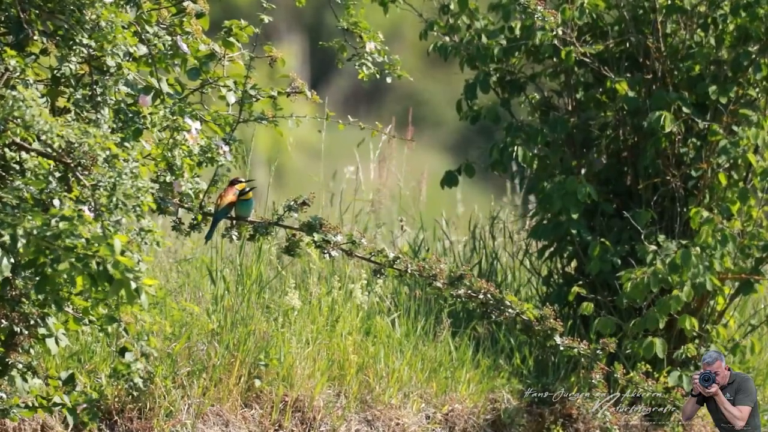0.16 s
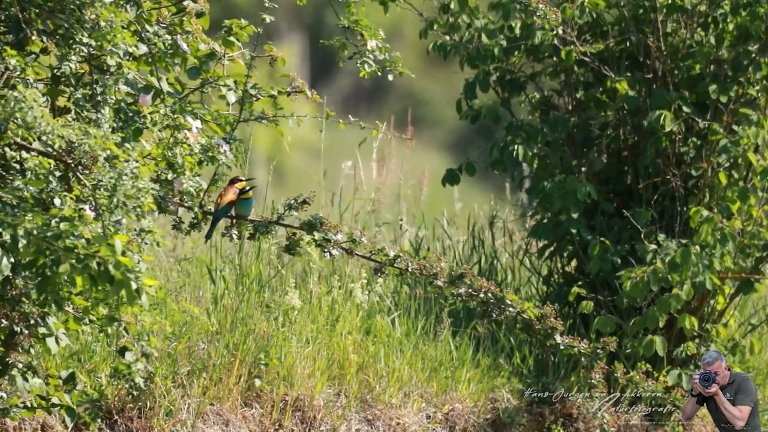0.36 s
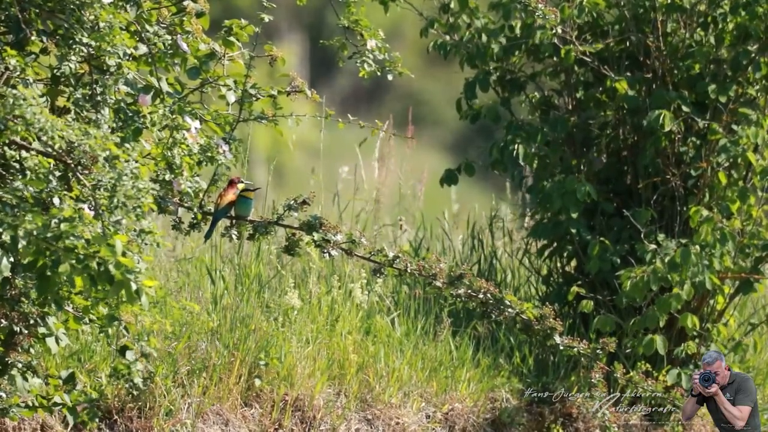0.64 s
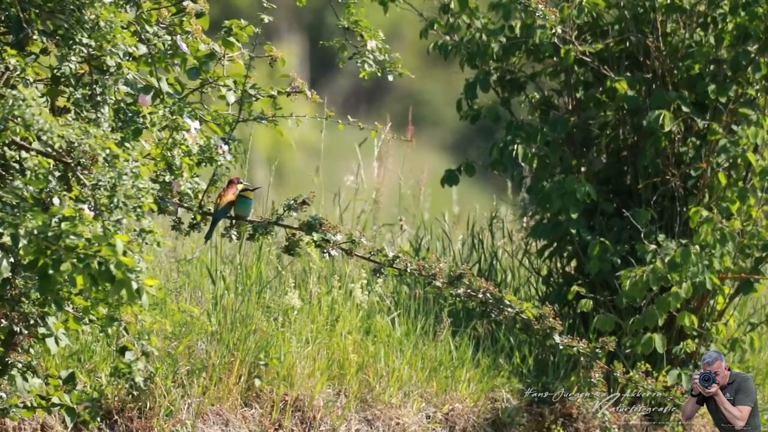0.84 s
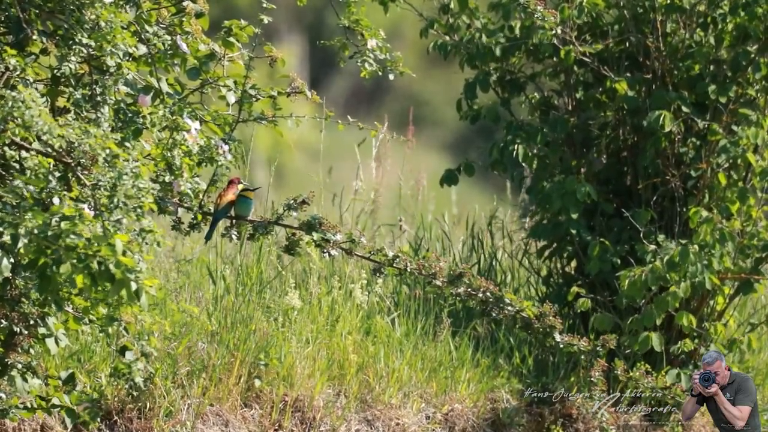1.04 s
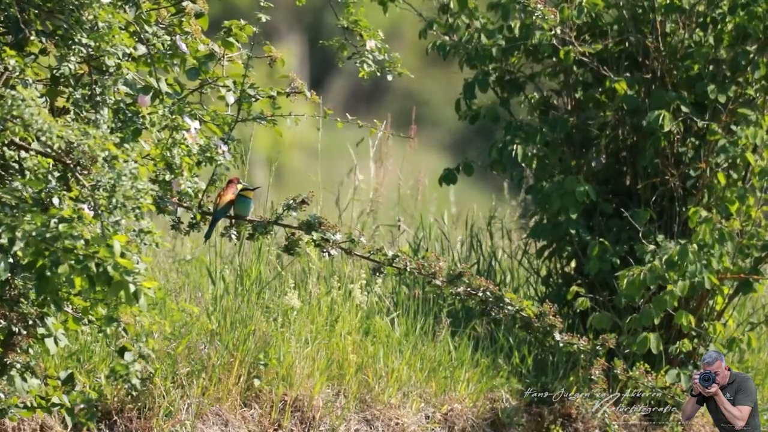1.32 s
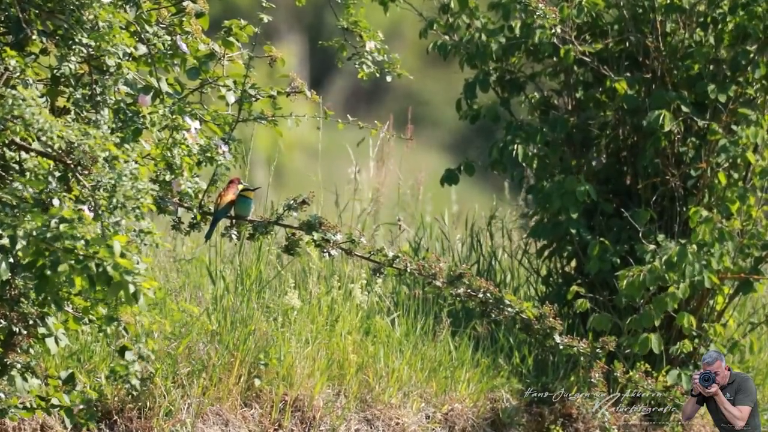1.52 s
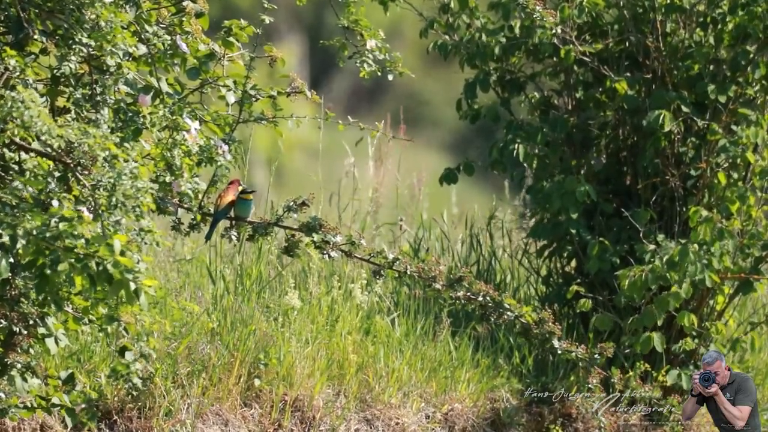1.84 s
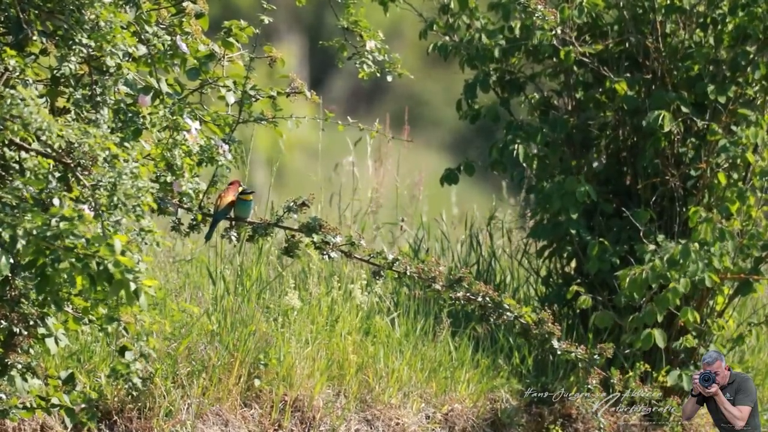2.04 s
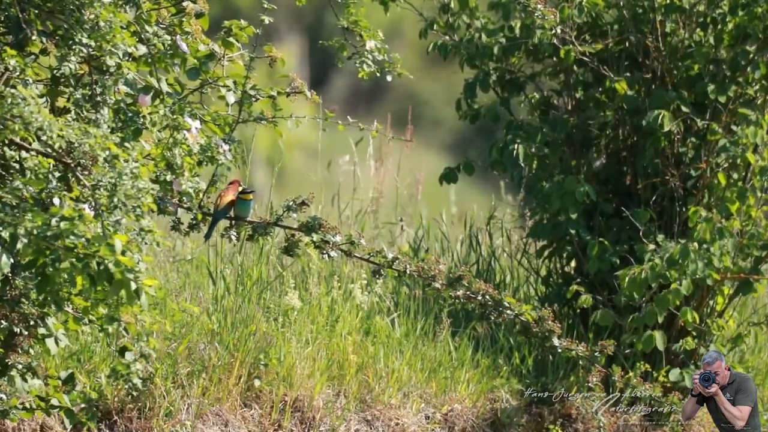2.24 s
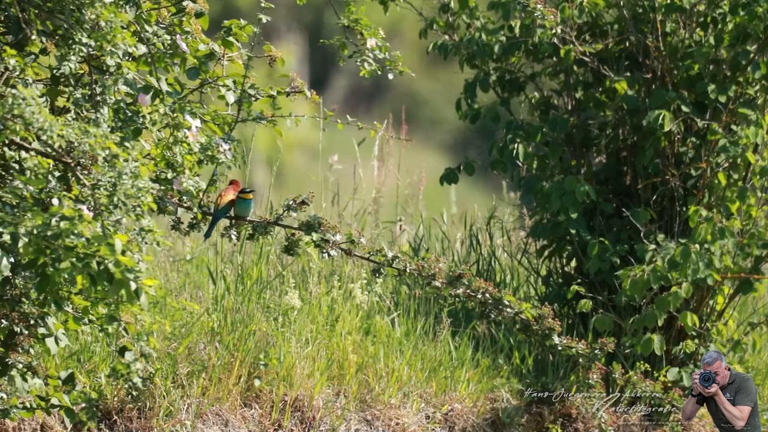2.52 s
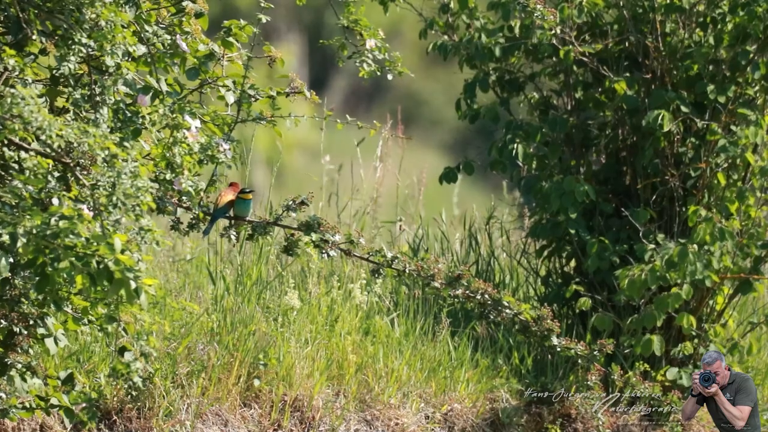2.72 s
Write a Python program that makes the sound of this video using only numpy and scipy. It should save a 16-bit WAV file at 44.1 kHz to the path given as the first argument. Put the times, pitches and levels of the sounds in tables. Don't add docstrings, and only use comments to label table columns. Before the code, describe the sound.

Short mellow bee-eater whistles, each with a tiny breathy lead-in and leafy tail, repeat over soft wind-like rumble, faint hum and leaf hiss; distant birds answer, picked up by two close microphones outdoors.

```python
import sys
import numpy as np
from scipy import signal
from scipy.fft import rfft, irfft, next_fast_len
from scipy.io import wavfile
from scipy.ndimage import uniform_filter1d

SR = 44100
rng = np.random.default_rng(int(sys.argv[2]) if len(sys.argv) > 2 else 0)


def materialize(psi):
    bounded = np.clip(np.atleast_2d(psi).T, -1, 1)
    quanta = np.round(bounded * 32767).astype(np.int16)
    wavfile.write(sys.argv[1], SR, quanta)


def makeup_ratio(level_db):
    decades = np.asarray(level_db, float) / 20
    return 10 ** decades


N = 126567
FAST = next_fast_len(N)

# f/Hz, level/dB per Hz
RUMBLE_SPECTRUM = [(16, -41.5), (28, -1), (48, 9), (62, -2.5), (151, -10.5), (188, -16), (223, -24),
                   (276, -16), (420, -31), (550, -83), (920, -120)]
# f/Hz, level/dB per Hz
LEAF_SPECTRUM = [(250, -38.5), (420, -10.5), (562, -8.5), (654, -6.5), (772, -16), (900, -10.5),
                 (2150, -11.5), (2370, -10.5), (11500, -31.5), (15000, -65.5), (22000, -120)]
# f/Hz, width/Hz, level/dB
MACHINE_HUM = [
    (43.2, 19, -62.5),
    (62.6, 14, -55.5),
    (99.4, 36, -62.5),
    (273.5, 12, -75),
    (526.4, 65, -83),
    (648.7, 49, -81),
    (881, 67, -82),
    (1358, 360, -78),
]
# f/Hz, width/Hz, level/dB, fade t/s, fade level/dB
ENGINE_NOTE = (191, 10.5, -62.5, -0.75, -7)
# delay t/s, left level/dB, right level/dB
EARLY_ECHOES = [
    (.0042, -19, -21),
    (.0105, -18, -20),
    (.021, -16, -18),
    (.036, -17, -19),
]
# t/s, length t/s, start f/Hz, end f/Hz, level/dB
STRAY_CHIRPS = [(.062, .022, 6800, 4300, -84), (.09, .05, 3800, 3900, -86), (.22, .04, 3700, 4100, -86),
                (1.39, .1, 3550, 3550, -88), (1.54, .03, 3100, 3050, -82), (1.6, .08, 3600, 3400, -86),
                (1.68, .04, 3300, 3000, -82), (2.015, .04, 1300, 1450, -80), (2.072, .03, 3150, 3000, -84),
                (2.052, .02, 4000, 3700, -84), (1.685, .02, 5000, 4000, -86),
                (1.082, .012, 1600, 1400, -78), (2.575, .04, 14800, 14400, -98),
                (2.14, .02, 14700, 14600, -98), (2.68, .18, 1680, 1660, -86),
                (1.095, .02, 15300, 15100, -98)]
# t/s, f/Hz, level/dB
LONE_WHISTLE = [
    (0.618, 2066, -76),
    (0.64, 1930, -70),
    (0.662, 1634, -75),
    (0.684, 1748, -65.5),
    (0.708, 1680, -70.5),
    (0.722, 1688, -71.5),
    (0.74, 1305, -66),
    (0.752, 1350, -75),
]
LONE_WHISTLE_OVERTONES = [-16, -17]
# t/s, f/Hz, level/dB
SONG_NOTES = [
    [(0, 4600, -80), (.006, 5600, -75), (.024, 6150, -73), (.029, 5800, -71), (.033, 4800, -72),
     (.047, 4500, -74), (.057, 3800, -78)],
    [(.004, 5800, -85), (.012, 6400, -80), (.026, 6750, -82)],
    [(.066, 4500, -79), (.071, 5600, -76), (.076, 6150, -73), (.086, 5600, -84)],
    [(.096, 3200, -83), (.104, 3700, -77), (.112, 3950, -69), (.116, 3900, -76), (.13, 3800, -80)],
    [(.112, 4300, -82), (.119, 4750, -77), (.133, 4850, -75)],
]
# t/s, gain level/dB, pitch factor, left-right level/dB
SONG_PHRASES = [
    (0.629, 6, 0.99, -6.5),
    (1.982, 3, 0.96, -4),
]
# t/s, level/dB, left-right level/dB, f/Hz
FAR_CALLS = [
    (.077, -68, -6, 2384),
    (.138, -61.5, 1, 2400),
    (.268, -66.5, 2, 2352),
    (.585, -80, -11, 2350),
    (.863, -69.5, -2, 2378),
    (1.447, -81.5, -36.5, 2325),
    (1.824, -70.5, 2, 2320),
    (1.962, -68, 3, 2310),
    (2.617, -75, 6, 2200),
]
# t/s, level/dB, left-right level/dB, length t/s, sag f/Hz
NEAR_CALLS = [
    (.1605, -41, -3.5, .025, 270),
    (.4925, -39, -4, .027, 290),
    (.7655, -37, -3, .024, 250),
    (1.0525, -36, -3, .03, 330),
    (2.173, -41, 3.5, .028, 320),
    (2.3272, -37, 6, .028, 170),
    (2.7145, -38, 8, .034, 400),
]
NEAR_TRIM = [-4.5, -6, -6.5, -5.5, -3.5, -4, -5.5]
NEAR_BRIGHTNESS = [4.5, 5, 5.3, 0.95, 5.3, 4, 9]
NEAR_AIR = [-80, -80, -44, -80, -46, -48, -49]
CALL_OVERTONES = [-26.5, -34.5, -46]
GRACE_OVERTONES = [-15, -17, -20]

RUMBLE_DB, HISS_DB, HISS_TOP_HZ = -51.5, -70.5, 12100
PORT_LAG_S, LAG_FROM_HZ, UNLIKE_HZ, UNLIKE_FLOOR_DB = 0.0002504, 680, 2200, -26
BUSH_T60_S, BUSH_GAP_S, BUSH_DB, FAR_BUSH_DB = 0.13, 0.0071, -5, -1.5
FIELD_T60_S, FIELD_DB = 0.2, -46
ATTACK_S, RELEASE_S, FLUTTER_DB, FLUTTER_HZ = .0013, 0.0048, 4, 220
GRACE_LEAD_S, GRACE_S, GRACE_HZ, GRACE_RISE_HZ, GRACE_DB = .0165, .008, 2000, 260, -20.5
CALL_HZ, ONSET_DROP_HZ, ONSET_DROP_S, SAG_POWER = 2366.5, 900, .0013, 1.7
HOLD_S, DROP_S, SWELL_DB, FADE_DB = .0155, .0012, 2.5, -10
BREATH_HZ, BREATH_WIDTH_HZ, GRACE_BREATH_DB, CALL_BREATH_DB = 3223, 2000, -1.5, -29.5
OVERTONE_SWELL_DB, OVERTONE_PAN_DB, OVERTONE_RISE_S = -4.5, -5.5, 0.00086
AIR_MULTIPLE, AIR_WIDTH_HZ = 6, 800


def shaped(gain):
    spectrum = rfft(rng.standard_normal(FAST)) * gain(np.fft.rfftfreq(FAST, 1 / SR) + 1)
    noise = irfft(spectrum, FAST)[:N]
    return noise / noise.std()


def band(hz, width):
    return shaped(lambda f: 1 / (1 + ((f - hz) / (width / 2)) ** 2))


def coloured(points, db):
    hz, level_db = np.array(points).T

    def gain(f):
        top_cut = 1 / (1 + (f / HISS_TOP_HZ) ** 30)
        return top_cut * makeup_ratio(np.interp(np.log(f), np.log(hz), level_db))
    return makeup_ratio(db) * shaped(gain)


def walk(rate, n=N):
    k = int(SR / rate)
    noise = rng.standard_normal(n + 2 * k)
    drift = uniform_filter1d(uniform_filter1d(noise, k), k)[k:k + n]
    return (drift - drift.mean()) / drift.std()


def rumble():
    return coloured(RUMBLE_SPECTRUM, RUMBLE_DB - 2) * makeup_ratio(1.5 * walk(4))


def machines():
    hum = sum(makeup_ratio(db) * band(hz, width) for hz, width, db in MACHINE_HUM)
    hz, width, db, fade_s, fade_db = ENGINE_NOTE
    faded = 1 / (1 + np.exp((fade_s - np.arange(N) / SR) / 0.064))
    return hum + band(hz, width) * makeup_ratio(db + fade_db * faded)


def leaf_hiss():
    return coloured(LEAF_SPECTRUM, HISS_DB) * makeup_ratio(.7 * walk(5))


def field():
    return rumble() + machines() + leaf_hiss()


def background():
    f = np.fft.rfftfreq(FAST, 1 / SR) + 1
    unlike = makeup_ratio(UNLIKE_FLOOR_DB) + 0.16 * f / (f + 150) + 0.78 / (1 + (UNLIKE_HZ / f) ** 2)
    own = np.clip(unlike, 0, 1)
    common = rfft(field(), FAST) * np.sqrt(1 - own ** 2)
    lag = np.exp(-1j * np.pi * f * PORT_LAG_S / (1 + (LAG_FROM_HZ / f) ** 4))
    return np.array([irfft(common * turn + own * rfft(field(), FAST), FAST)[:N] for turn in (lag, 1 / lag)])


def decay(t, t60):
    return np.exp(-np.log(1000) * t / t60) / np.sqrt(t60 * SR / np.log(1e6))


def place(out, at_s, x, pan_db, wet_db, echo_db=-60):
    t = np.arange(12000) / SR
    envelope = makeup_ratio(wet_db) * decay(t, BUSH_T60_S) + makeup_ratio(FIELD_DB) * decay(t, FIELD_T60_S)
    envelope = envelope * np.clip(t / BUSH_GAP_S, 0, 1)
    shared, own = rng.standard_normal((2, 2, len(t)))
    scatter = 0.76 * shared[0] + 0.62 * own
    tail = uniform_filter1d(scatter, size=3, axis=1) * np.sqrt(3) * envelope
    for delay_s, left_db, right_db in EARLY_ECHOES:
        tail[:, int(delay_s * SR)] += makeup_ratio(echo_db + np.array([left_db, right_db]))
    side_db = pan_db * np.array([[.5], [-.5]])
    y = signal.fftconvolve(x[None], tail, axes=1) * makeup_ratio(1.2 * side_db)
    y[:, :len(x)] += x * makeup_ratio(side_db)
    i = int(at_s * SR)
    out[:, i:i + y.shape[1]] += y[:, :N - i]


def tone(hz, db, multiples_db=(0,), first=1, flutter_db=FLUTTER_DB):
    n = len(hz)
    phase = 2 * np.pi * np.cumsum(hz) / SR
    t = np.arange(n) / SR
    edge = np.clip(t / ATTACK_S, 0, 1) * np.clip(t[::-1] / RELEASE_S, 0, 1)
    wave = np.zeros(n)
    for k, partial_db in enumerate(multiples_db, start=first):
        wave += makeup_ratio(partial_db + flutter_db * walk(FLUTTER_HZ, n)) * np.sin(k * phase)
    return np.sqrt(2) * edge * makeup_ratio(db) * wave


def glide(rows, factor=1, overtones_db=(), flutter_db=-1.5):
    at, hz, db = np.array(rows).T
    t = at[0] + np.arange(int((at[-1] - at[0]) * SR)) / SR
    pitch = uniform_filter1d(np.interp(t, at, hz), size=90)
    return tone(factor * pitch, np.interp(t, at, db), [0, *overtones_db], flutter_db=flutter_db)


def stray_chirps(out):
    for s, length_s, start_hz, end_hz, db in STRAY_CHIRPS:
        chirp = glide([(0, start_hz, db), (length_s, end_hz, db)])
        place(out, s, chirp * walk(350, len(chirp)), 0, 2)


def lone_whistler(out):
    place(out, LONE_WHISTLE[0][0], glide(LONE_WHISTLE, 0.97, LONE_WHISTLE_OVERTONES), 0, -6)


def songbird(out):
    for s, db, factor, pan_db in SONG_PHRASES:
        for note in SONG_NOTES:
            place(out, s + note[0][0], makeup_ratio(db) * glide(note, factor, flutter_db=3), pan_db, -4)


def breath(n, db):
    return tone(np.full(n, float(BREATH_HZ)), db) * walk(BREATH_WIDTH_HZ, n)


def grace_pitch():
    return GRACE_HZ + GRACE_RISE_HZ * np.linspace(0, 1, int(GRACE_S * SR)) ** 2


def after_grace(grace, whistle):
    pause = np.zeros(int(GRACE_LEAD_S * SR) - len(grace))
    return np.concatenate([grace, pause, whistle])


def whistle_track(length_s, sag_hz, hz):
    t = np.arange(int(length_s * SR)) / SR
    u = t / length_s
    return t, u, hz - sag_hz * u ** SAG_POWER


def call_fundamental(db, length_s, sag_hz, hz):
    t, u, pitch = whistle_track(length_s, sag_hz, hz)
    fade_db = SWELL_DB * t / HOLD_S + FADE_DB / (1 + np.exp(-(t - HOLD_S) / DROP_S))
    onset_hz = ONSET_DROP_HZ * np.exp(-t / ONSET_DROP_S)
    whistle = tone(pitch + onset_hz, db + fade_db, flutter_db=-2.38)
    whistle = whistle + breath(len(t), db + CALL_BREATH_DB - 10 * u)
    grace_hz, grace_db = grace_pitch(), db + GRACE_DB
    grace = tone(grace_hz, grace_db, flutter_db=5.5) + breath(len(grace_hz), grace_db + GRACE_BREATH_DB)
    return after_grace(grace, whistle)


def call_overtones(db, length_s, sag_hz, hz, bright_db, air_db):
    t, u, pitch = whistle_track(length_s, sag_hz, hz)
    level_db = db + bright_db + OVERTONE_SWELL_DB * u
    partials = tone(pitch + 60 * np.exp(-u / 0.27), level_db, CALL_OVERTONES, first=2)
    air = tone(AIR_MULTIPLE * pitch, db + air_db - 12 * u) * walk(AIR_WIDTH_HZ, len(t))
    rise = 1 - np.exp(-t / OVERTONE_RISE_S)
    grace = tone(grace_pitch(), db + GRACE_DB + bright_db / 2, GRACE_OVERTONES, first=2, flutter_db=6.5)
    return after_grace(grace, (partials + air) * rise)


def far_bee_eaters(out):
    for s, db, pan_db, hz in FAR_CALLS:
        place(out, s - GRACE_LEAD_S, call_fundamental(db, 0.032, 420, hz), pan_db, FAR_BUSH_DB, 6)


def near_bee_eaters(out):
    for event, bright_db, air_db, trim_db in zip(NEAR_CALLS, NEAR_BRIGHTNESS, NEAR_AIR, NEAR_TRIM):
        s, db, pan_db, length_s, sag_hz = event
        voice = (db + trim_db, length_s, sag_hz, CALL_HZ)
        start_s = s - GRACE_LEAD_S
        place(out, start_s, call_fundamental(*voice), pan_db, BUSH_DB, 0)
        place(out, start_s, call_overtones(*voice, bright_db, air_db), OVERTONE_PAN_DB, BUSH_DB - 4, -3)


def scene():
    out = background()
    stray_chirps(out)
    lone_whistler(out)
    songbird(out)
    far_bee_eaters(out)
    near_bee_eaters(out)
    return out


def low_pass(x):
    return signal.sosfilt(signal.butter(12, 15710, fs=SR, output="sos"), x)


def record(dry):
    return low_pass(dry)


dry = scene()
out = record(dry)
materialize(out)
```